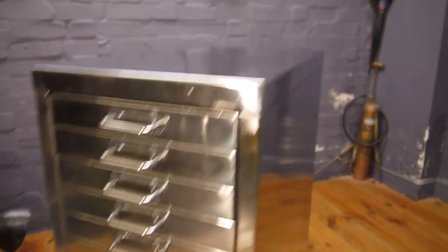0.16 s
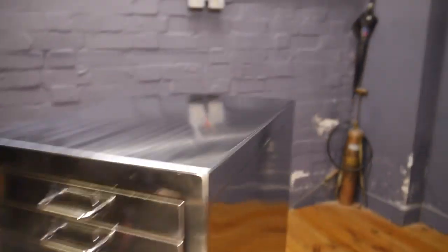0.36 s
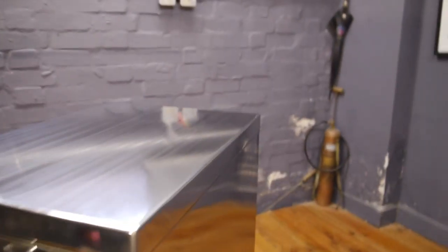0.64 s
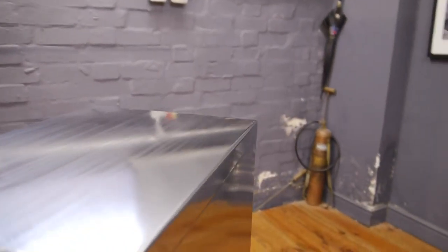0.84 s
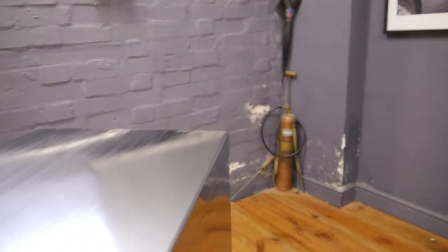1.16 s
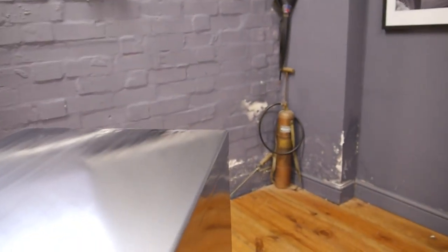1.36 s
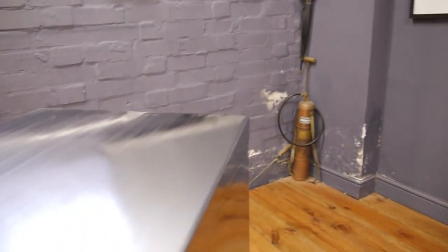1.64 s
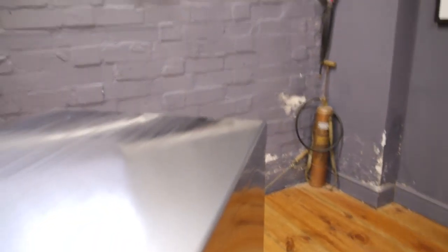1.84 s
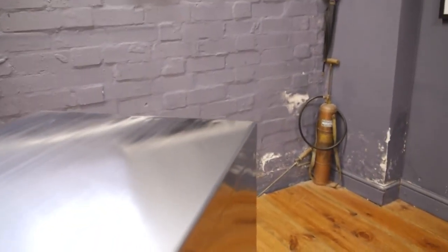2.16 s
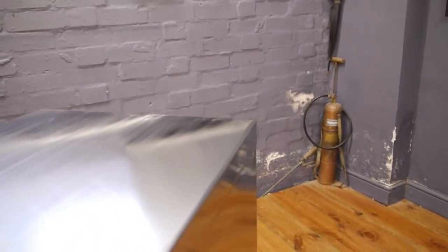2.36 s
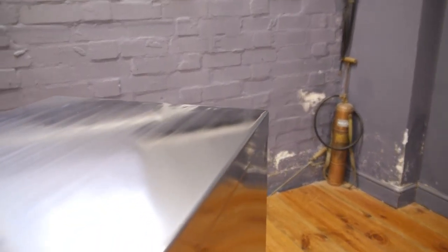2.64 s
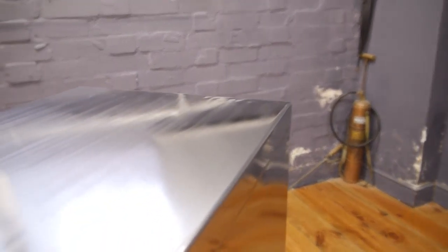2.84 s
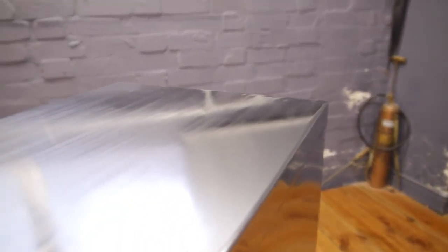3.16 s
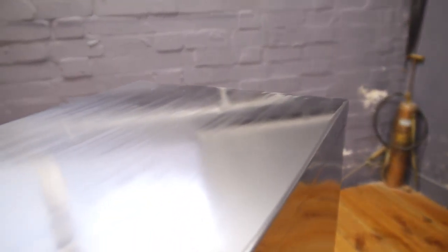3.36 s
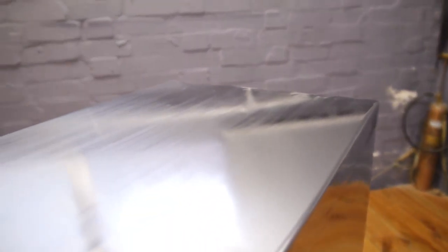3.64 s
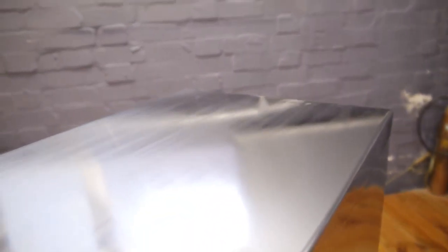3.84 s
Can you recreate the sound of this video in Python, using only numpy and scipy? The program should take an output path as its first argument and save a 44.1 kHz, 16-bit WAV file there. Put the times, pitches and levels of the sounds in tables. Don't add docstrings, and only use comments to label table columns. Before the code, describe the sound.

A shallow steel drawer is worked in a sheet-metal cabinet: first quiet foot thuds and ticks, then rattling, hissing slides with hollow knocks growing louder, in a hard-walled room, close handheld stereo microphone.

```python
import sys
import numpy as np
from scipy import signal
from scipy.fft import rfft, irfft
from scipy.io import wavfile
from scipy.ndimage import uniform_filter1d

SR = 44100
rng = np.random.default_rng(int(sys.argv[2]) if len(sys.argv) > 2 else 0)


def gain_from_decibels(decibels):
    exponent = np.asarray(decibels, float) / 20
    return 10 ** exponent


def waveform_to_disk(signal):
    frames = np.transpose(np.atleast_2d(signal))
    scaled = np.clip(frames, -1, 1) * 32767
    samples = np.round(scaled).astype(np.int16)
    wavfile.write(sys.argv[1], SR, samples)


N = 176400
T = np.arange(N) / SR


def unit(x):
    return x / np.sqrt(np.mean(x ** 2) + 1e-30)


def colour(x, table):
    size = 4096
    hz, db = np.array(table, float).T
    log_hz = np.log(np.fft.rfftfreq(size, 1 / SR) + 1)
    cepstrum = irfft(np.interp(log_hz, np.log(hz + 1), db) * np.log(10) / 20)
    cepstrum[1:size // 2] *= 2
    cepstrum[size // 2 + 1:] = 0
    response = irfft(np.exp(rfft(cepstrum)))
    return signal.fftconvolve(x, response)[:len(x)]


def band(x, hz, q):
    return signal.lfilter(*signal.iirpeak(hz, q, fs=SR), x)


def decay(t, t60):
    return gain_from_decibels(-60 * t / t60)


def walk(rate_hz):
    k = int(SR / rate_hz)
    noise = rng.standard_normal(N + 4 * k)
    smooth = uniform_filter1d(uniform_filter1d(noise, k), k)
    return np.clip(unit(smooth[2 * k:-2 * k]), -2, 2)


def grains(per_s, spread_db):
    hits = rng.random(N) < per_s / SR
    sign = np.sign(rng.standard_normal(N))
    size_db = spread_db * np.minimum(rng.exponential(size=N), 3)
    return unit(hits * sign * gain_from_decibels(size_db))


def add(out, x, at_s, db):
    i = int(at_s * SR)
    out[i:i + len(x)] += (gain_from_decibels(db) * x / np.max(np.abs(x)))[:N - i]


# frequency_hz [Hz], level_db [dB]
AIR_SPECTRUM = [(15, -33), (25, -2), (122, -18), (198, -5.5), (826, -15.5), (1020, -17), (1850, -31.5),
                (7700, -29.5), (15500, -41)]


def hush():
    return unit(colour(rng.standard_normal(N), AIR_SPECTRUM)) * gain_from_decibels(-55.5 + walk(2))


# pitch_hz [Hz], level_db [dB], t60_s [s]
PANEL_MODES = [(160.7, 2.5, 1), (234.5, -1, 1), (289.8, 1, 0.2), (327, -5.5, 0.47), (385.2, -9.5, 1),
               (458, 3.5, 0.12), (529.6, 5.5, 0.39), (670, -32, 0.36), (827, -8, 0.41), (945, -15, 0.32),
               (1101, -0.5, 0.8), (1138, -23.5, 0.36), (1354, -19, 0.23), (1535, -16.5, 1)]


def panels(force, scatter_db):
    out = 0
    for (hz, db, t60), scatter in zip(PANEL_MODES, scatter_db):
        r = np.exp(-np.log(1000) / (t60 * SR))
        poles = [1, -2 * r * np.cos(2 * np.pi * hz / SR), r * r]
        mode = signal.lfilter([1, 0, -1], poles, force)
        out = out + gain_from_decibels(db + scatter) * np.sqrt(1 - r) * mode
    return out


def blows(table, q, ring_db, top_db):
    out, t = np.zeros(N), T[:SR // 3]
    mode_hz = np.array(PANEL_MODES)[:, 0]
    for at_s, db, hz, t60 in table:
        tail = rng.standard_normal(len(t)) * decay(t, np.clip(t60, 0.03, 0.5))
        push = tail * decay(t, 0.025) + 3.7 * (t == 0)
        scatter_db = 9.2 * rng.standard_normal(len(mode_hz)) - 13.3 * np.abs(np.log2(mode_hz / hz))
        body = unit(band(band(tail + 1.63 * push, hz, q), hz, q / 2))
        ring = unit(panels(push + 0.18 * tail, scatter_db))
        add(out, body + gain_from_decibels(ring_db) * ring + gain_from_decibels(top_db) * unit(tail), at_s, db)
    return out


# start_s [s], level_db [dB], centre_hz [Hz], t60_s [s]
FOOTFALLS = [
    (0.168, -38.5, 1050, 0.46),
    (0.286, -37, 560, 0.56),
    (0.317, -43.5, 300, 0.26),
    (0.508, -61, 177, 0.2),
    (0.566, -50, 730, 0.15),
    (0.696, -32.5, 303, 0.44),
    (0.814, -34, 520, 0.23),
    (1.017, -39.5, 520, 0.57),
    (1.267, -38.5, 455, 0.13),
    (1.407, -43, 371, 0.23),
]


def steps():
    return blows(FOOTFALLS, q=1.54, ring_db=-38, top_db=-22)


# start_s [s], level_db [dB], centre_hz [Hz], t60_s [s]
HARD_TICKS = [(0.1455, -34, 6700, 0.012), (0.185, -50, 2200, 0.03), (0.3114, -35, 6200, 0.039),
              (0.3418, -21.5, 6100, 0.01), (0.914, -52, 5100, 0.036), (1.054, -64, 2200, 0.023),
              (1.2666, -44, 2360, 0.033), (1.6262, -26, 7040, 0.03), (2.0844, -61, 7800, 0.03),
              (2.0937, -43.5, 8270, 0.013), (2.4117, -26.5, 7460, 0.03), (2.4585, -26, 2340, 0.088),
              (2.9022, -24.5, 6700, 0.03), (2.9383, -25, 4110, 0.075), (3.8158, -13.5, 6970, 0.033)]


def ticks():
    out, t = np.zeros(N), T[:SR // 10]
    for at_s, db, hz, t60 in HARD_TICKS:
        burst = rng.standard_normal(len(t)) * decay(t, t60)
        add(out, band(burst, hz, 4.5) + 0.069 * burst, at_s, db)
    return out


# start_s [s], length_s [s], level_db [dB], pitch_hz [Hz]
HANDLE_SQUEAKS = [
    (2.056, 0.04, -64, 8100),
    (2.131, .07, -58.5, 8040),
    (2.136, 0.025, -62, 6000),
    (2.785, 0.019, -61.5, 7630),
    (2.906, 0.013, -41.5, 6320),
]


def squeaks():
    out, t = np.zeros(N), T[:SR // 10]
    for at_s, length_s, db, hz in HANDLE_SQUEAKS:
        swell = np.sin(np.pi * np.clip(t / length_s, 0, 1)) ** 0.53
        add(out, band(rng.standard_normal(len(t)), hz, 23) * swell, at_s, db + 11.5)
    return out


# start_s [s], length_s [s], level_db [dB], pitch_hz [Hz]
SINGING_MODES = [(1.524, 0.059, -36.5, 164.2), (1.754, 0.46, -53, 124.9), (1.72, 0.38, -56, 820.5),
                 (2.127, 0.085, -48, 778), (2.465, 0.1, -24, 156.4), (2.62, 0.31, -44.5, 105),
                 (2.928, 0.1, -37.5, 1488), (3.131, 0.37, -34, 827), (3.18, 0.19, -41, 1138),
                 (3.34, 0.057, -31, 515), (3.56, 0.042, -38, 1109), (3.572, 0.023, -21.5, 534.7),
                 (3.589, 0.054, -29.5, 172), (3.7, 0.14, -28.5, 1101), (3.725, 0.049, -30, 1535),
                 (3.788, 0.078, -28.5, 386.8)]


def sings():
    attack_s, t60_s, width_hz, waver_db = 0.011, 0.29, 5, 1.5
    out, t, drift, waver = np.zeros(N), T[:SR], walk(38.2), walk(22.7)
    for at_s, length_s, db, hz in SINGING_MODES:
        k = rng.integers(N - SR)
        shape = np.clip(t / attack_s, 0, 1) * decay(np.maximum(t - length_s, 0), t60_s)
        phase = 2 * np.pi * np.cumsum(hz + width_hz * drift[k:k + SR]) / SR
        add(out, gain_from_decibels(waver_db * waver[k:k + SR]) * shape * np.sin(phase), at_s, db + 5.5)
    return out


# start_s [s], level_db [dB], centre_hz [Hz], t60_s [s]
DRAWER_KNOCKS = [(1.432, -26, 362, 0.27), (1.517, -24.5, 282, 0.9), (1.626, -14.5, 308, 0.45),
                 (1.649, -20, 328, 0.69), (1.869, -36, 511, 0.22), (2.358, -22.5, 162, 0.18),
                 (2.395, -15, 200, 0.52), (2.464, -14, 173, 0.64), (2.518, -15.5, 153, 0.8),
                 (2.757, -25.5, 222, 0.67), (2.935, -8.5, 283, 0.32), (2.988, -15, 205, 0.44),
                 (3.341, -14, 496, 0.65), (3.508, -15.5, 277, 0.63), (3.58, -11, 490, 0.1),
                 (3.614, -17, 520, 0.39), (3.815, -7, 1060, 0.12), (3.854, -13, 390, 0.27)]


def knocks():
    return blows(DRAWER_KNOCKS, q=1.6, ring_db=-3.5, top_db=-38)


# [dB,
# rattle over the hiss]
MOVEMENTS = [
    [(0.68, -89, 7), (0.712, -89, 10), (0.746, -56, 8), (0.82, -68, 6), (0.956, -74, -6), (1.09, -65, 7),
     (1.4, -90, 22)],
    [(1.41, -71, 9), (1.428, -57.5, 3), (1.61, -54, 7), (1.632, -36, 12.5), (1.846, -57.5, 6),
     (1.878, -43.5, 7), (2.05, -77.5, 18)],
    [(2.05, -78.5, 20), (2.252, -55.5, 10), (2.286, -42.5, 3), (2.492, -40, 13.5), (2.726, -79, 23.5),
     (2.788, -65, 14.5), (2.89, -87, 18.5)],
    [(2.9, -54.5, 3.5), (2.948, -39.5, 19), (2.992, -46.5, 16.5), (3.14, -35.5, 3), (3.184, -26.5, -1),
     (3.422, -54.5, 20.5), (3.47, -52, 3)],
    [(3.48, -64, 13), (3.57, -39, 5.5), (3.598, -41, 16.5), (3.608, -38, 6), (3.824, -26.5, 2),
     (3.862, -41, -11.5), (4.0, -56.5, 17)],
]
# frequency_hz [Hz], level_db [dB per Hz]
HISS_SPECTRUM = [(1200, -15.5), (1900, -3.5), (2450, -0.5), (3300, -8.5), (4100, -4), (4600, -4.5),
                 (7500, -3), (11000, -15)]
# frequency_hz [Hz], level_db [dB per Hz]
SHAKE_SPECTRUM = [(60, -23), (130, -1.5), (350, 7), (900, -2.5), (1500, -5.5), (2200, -21.5), (4000, -43)]


def slides():
    rows = np.concatenate([np.array(movement, float) for movement in MOVEMENTS])
    hiss_db = np.interp(T, rows[:, 0], rows[:, 1], left=-90)
    load_db = np.interp(T, rows[:, 0], rows[:, 2], left=-90)
    grit = grains(per_s=2500, spread_db=-1) + 1.06 * rng.standard_normal(N)
    hiss = unit(colour(grit, HISS_SPECTRUM)) * gain_from_decibels(hiss_db + 1.76 * walk(45))
    bumps = grains(per_s=460, spread_db=2) * gain_from_decibels(1.68 * walk(34))
    load = gain_from_decibels(hiss_db + load_db)
    shake = unit(colour(bumps, SHAKE_SPECTRUM)) * load
    even = [0] * len(PANEL_MODES)
    ring = panels(bumps * load * (T > 1.4), even) / np.std(panels(bumps, even))
    return hiss + shake + gain_from_decibels(-7.5) * ring


def room(x):
    t60_s, top_hz = 0.36, 4840
    t = T[:SR // 2]
    low = signal.lfilter(*signal.butter(1, top_hz, fs=SR), rng.standard_normal(len(t)))
    full = rng.standard_normal(len(t))
    echo = low * decay(t, t60_s) + 0.46 * full * decay(t, 0.72 * t60_s)
    return signal.fftconvolve(x, echo / np.sqrt(np.sum(echo ** 2)))[:N]


# [dB, side over mid]
PORT_DIFFERENCE = [(50, -7), (160, -52.5), (500, -23), (1290, -5.5), (2380, -5), (4400, -8.5), (8120, -9),
                   (12000, 1)]


def scene():
    left_share, room_gain = 0.6, gain_from_decibels(-7)
    near = slides() + knocks() + steps()
    close = ticks() + squeaks() + sings()
    direct = near + close
    mid = direct + room_gain * room(near + 0.18 * close)
    scattered = signal.fftconvolve(direct, unit(rng.standard_normal(400)) / 20)[:N]
    other = scattered + room_gain * room(near + 0.23 * close)
    difference = left_share * mid + np.sqrt(1 - left_share ** 2) * other + 2.05 * hush()
    side = colour(difference, PORT_DIFFERENCE)
    mid = mid + hush()
    return np.array([mid + side, mid - side])


def low_pass(x):
    return signal.sosfilt(signal.butter(12, 16490, fs=SR, output="sos"), x)


def record(dry):
    bass_cut = signal.sosfilt(signal.butter(2, 70, "high", fs=SR, output="sos"), dry)
    mix = signal.sosfilt(signal.butter(4, 14000, fs=SR, output="sos"), bass_cut)
    return low_pass(mix)


dry = scene()
out = record(dry)
waveform_to_disk(out)
```